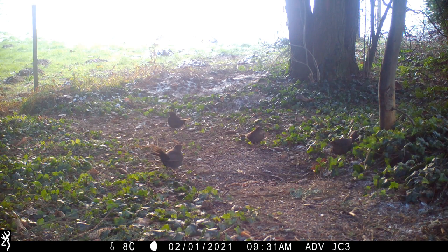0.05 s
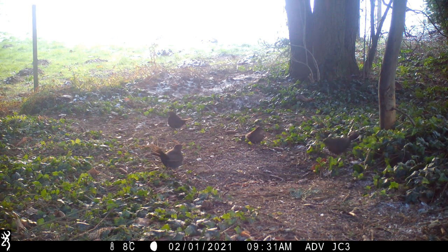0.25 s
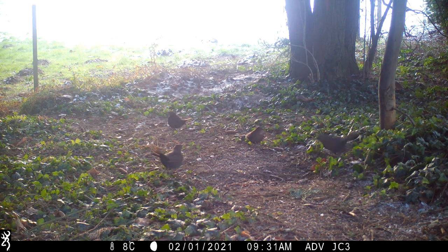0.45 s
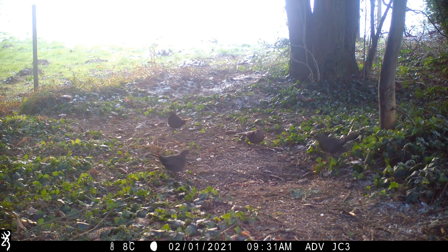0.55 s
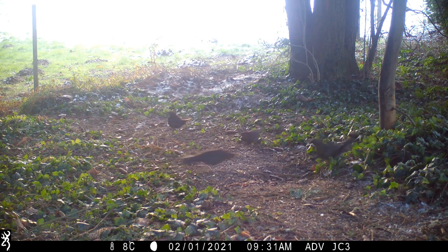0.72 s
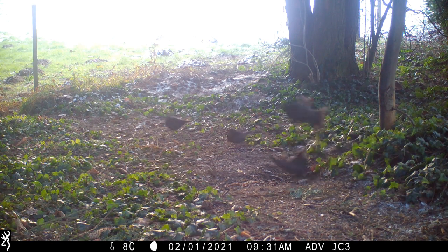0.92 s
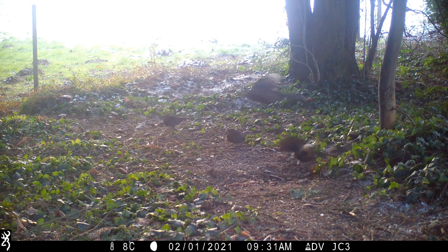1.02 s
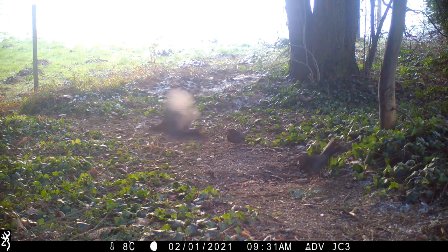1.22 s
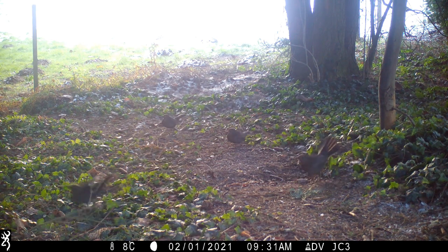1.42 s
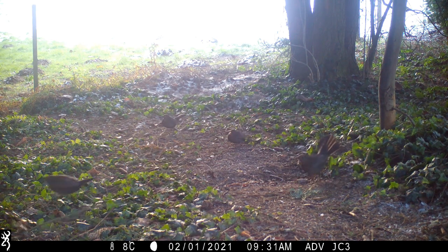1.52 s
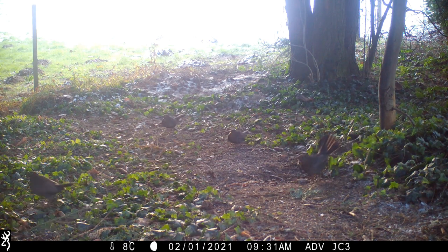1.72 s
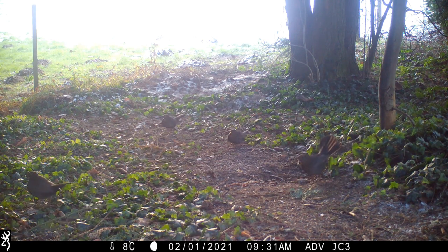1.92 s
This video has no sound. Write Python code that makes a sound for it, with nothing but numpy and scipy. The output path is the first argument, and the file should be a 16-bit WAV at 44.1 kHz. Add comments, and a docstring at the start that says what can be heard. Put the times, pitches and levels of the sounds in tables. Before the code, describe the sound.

A blackbird clucks twice after a snappy wing flap. Birds scuff through dry leaves, one flutters off, then two more clucks and a distant whistle follow. The quiet woodland has a steady faraway wash and a faint microphone whine.

```python
"""Blackbirds forage in a quiet woodland clearing, over a distant wash and a trail camera's faint whine.
First, wings flap and snap, and one bird gives two short clucks that arch in pitch and echo off trunks.
Then feet scuff and crack the dry leaves, and a bird takes wing with a soft rush of air.
Thin, high bird notes come from far away, and the near bird clucks twice more.
Last come a longer, lower far whistle, two snaps and one more flap."""
import sys
import numpy as np
from scipy import signal
from scipy.fft import rfft, irfft
from scipy.io import wavfile

SR = 44100
rng = np.random.default_rng(int(sys.argv[2]) if len(sys.argv) > 2 else 0)


def put_to_file(sound):
    """Save the sound as 16-bit audio at rate SR, in the file named by the first command-line argument."""
    columns = np.atleast_2d(sound).T  # one column per channel
    safe = np.clip(columns, -1, 1)
    whole_steps = np.round(safe * 32767)
    wavfile.write(sys.argv[1], SR, whole_steps.astype(np.int16))


N = 85995
TIME = np.arange(N) / SR


def amp(db):
    """Turns decibels (dB) into a number to multiply a sound by."""
    return 10 ** (np.asarray(db) / 20)


def unit(x):
    """Scales a signal to an average strength (rms) of 1."""
    return x / np.sqrt(np.mean(x ** 2) + 1e-20)


def add(mix, start, sound):
    """Mixes a sound in at a start time in seconds."""
    part = mix[max(round(start * SR), 0):][:len(sound)]
    part += sound[:len(part)]


def colour(x, points, tilt_db=0):
    """Sets the balance of low and high in x from (Hz, dB) points and a tilt per octave; strength 1."""
    octaves = np.log2(np.fft.rfftfreq(len(x), 1 / SR) + 1)
    hz, db = np.transpose(points)
    gain = amp(np.interp(octaves, np.log2(hz), db) + tilt_db * octaves)
    return unit(irfft(rfft(x) * gain, len(x)))


def drift(hz):
    """A smooth random wobble, up to about hz times a second; strength 1."""
    freqs = np.fft.rfftfreq(N, 1 / SR)
    keep_slow = np.exp(-(freqs / hz) ** 2) * (freqs > 0)
    return unit(irfft(rfft(rng.standard_normal(N)) * keep_slow, N))


def swell(peak, rise, fall):
    """A loudness curve that rises softly to a peak and dies away; times in seconds."""
    t = TIME - peak
    return np.exp(-(np.minimum(t, 0) / rise) ** 2 - np.maximum(t, 0) / fall)


def crackle(hiss, per_second=2200, spread_db=5):
    """Many tiny cracks of uneven size, with a share of smooth hiss mixed in."""
    size = amp(spread_db * np.minimum(rng.exponential(1, N), 3.5)) * rng.choice([-1, 1], N)
    cracks = size * (rng.random(N) < per_second / SR)
    return unit(cracks) + hiss * rng.standard_normal(N)


# The tone of the wash, then of its highest part. Each row: frequency in Hz, relative level in dB.
WASH_COLOUR = [(15, -57.5), (25, -24), (143, -17.5), (511, -8.5), (966, -5), (1250, -3), (1380, -2.5),
               (1620, -4.5), (1780, -5.5), (2010, -10), (3620, -23.5), (5660, -36.5), (7000, -45),
               (9100, -63), (15400, -120)]
WASH_TOP_COLOUR = [(8500, -50), (10800, -55), (12000, -70), (15500, -73)]
# The low hum. Each row: pitch in Hz, level in dB.
HUM_TONES = [(49, -69), (268, -67.5)]


def background():
    """The distant wash of the countryside, a nearly steady noise, with a trace of low hum."""
    level_db = -40.5 + .4 * drift(2.3)
    wash = amp(level_db) * colour(rng.standard_normal(N), list(WASH_COLOUR) + list(WASH_TOP_COLOUR))
    hum = sum(amp(db) * np.sqrt(2) * np.sin(2 * np.pi * (hz * TIME + rng.random()))
              for hz, db in HUM_TONES)
    return wash + hum


# Notes of far birds. Each row: start in seconds, length in seconds, pitch in Hz, level in dB.
FAR_WHISTLES = [(.305, 0.032, 8100, -63), (1.125, .035, 8150, -63), (1.275, .035, 6770, -61),
                (1.78, .30, 1358, -38.5)]


def far_whistle(length, hz, db, waver_hz=25):
    """A far bird whistles one faint, wavering note."""
    t = np.arange(0, length, 1 / SR)
    pitch = hz + waver_hz * drift(200)[:len(t)]
    fade = np.sqrt(np.sin(np.pi * t / length))
    return amp(db) * fade * np.sin(2 * np.pi * np.cumsum(pitch) / SR)


# Echoes from the ground and trunks. Each row: delay in seconds, level in dB.
TRUNK_ECHOES = [(.0085, -36), (0.0126, -25), (0.0147, -19.5), (0.0246, -43)]


def woodland(x):
    """Adds a few distinct echoes, quick scatter from the undergrowth and a faint, dull tail."""
    t = np.arange(SR // 2) / SR
    echoes = np.zeros(len(t))
    for db, fade_s in [(-25, .086), (-36.5, .95)]:  # the scatter, then the tail
        dull_noise = colour(rng.standard_normal(len(t)), [(200, 9.5), (2000, 8), (8000, -4.5)])
        tail = dull_noise * amp(-60 * t / fade_s) * (t > .01)
        echoes += amp(db) * tail / np.linalg.norm(tail)
    soft_pulse = np.hanning(11)
    for delay, db in TRUNK_ECHOES:
        add(echoes, delay, amp(db) * soft_pulse / soft_pulse.sum())
    return x + signal.fftconvolve(x, echoes)[:N]


# The tone of dry leaves. Each row: frequency in Hz, relative level in dB.
LEAF_COLOUR = [(20, -80.5), (150, -34.5), (600, -18), (1200, 0.5), (2400, 1.5), (3500, -1.5), (5000, -11.5),
               (7000, -16), (9000, -28), (11000, -33), (12500, -57.5)]
# The rustle between scuffs. Each row: time in seconds, level in dB.
RUSTLE_LEVELS = [(0, -51), (.2, -45), (0.301, -50), (.48, -52), (.56, -46), (.70, -46), (.95, -44),
                 (1.12, -49), (1.25, -54), (1.35, -50), (1.43, -48), (1.75, -46.5), (1.95, -51)]
# Scuffs of feet. Each row: peak time, rise and fall in seconds, level in dB,
# treble tilt in dB per octave (higher is brighter).
FOOT_SCUFFS = [(.125, 0.026, 0.039, -39.5, -0.5), (.513, 0.0048, 0.022, -29.5, -3.5),
               (.536, 0.0033, 0.022, -32.5, -1.5), (0.586, .006, 0.017, -36, -5.5),
               (.617, 0.0084, 0.0096, -36, 0), (.660, 0.021, 0.013, -39.5, -4.5),
               (.730, 0.0027, 0.0061, -42, -1), (0.739, 0.0037, 0.014, -31, -0.5),
               (0.753, 0.003, 0.0042, -27.5, -5), (0.794, 0.015, 0.016, -34, -0.5),
               (0.817, 0.0043, 0.0033, -24.5, -1), (0.862, 0.024, .010, -29, -1),
               (.897, 0.0054, 0.046, -40, 0), (.951, 0.023, 0.025, -35, -2.5),
               (1.044, 0.002, 0.0084, -29.5, -2), (1.385, 0.01, 0.021, -33.5, 0),
               (1.510, .005, 0.015, -36.5, 3.5), (1.573, .008, .008, -45, 1.5),
               (1.597, 0.0094, 0.036, -35.5, -0.5), (1.823, 0.015, 0.018, -40, 3)]


def leaves():
    """Dry leaves rustle unevenly, and each scuff of a foot sets off a clump of crackles."""
    rustle_db = np.interp(TIME, *np.transpose(RUSTLE_LEVELS)) + 3.6 * drift(22)
    rustle = amp(rustle_db) * colour(crackle(hiss=.81), LEAF_COLOUR)
    scuffs = sum(amp(db) * swell(peak, rise, fall) * colour(crackle(hiss=.31), LEAF_COLOUR, tilt_db)
                 for peak, rise, fall, db, tilt_db in FOOT_SCUFFS)
    return rustle + scuffs


# Wing strokes, then the rush of air as a bird takes wing.
# Each row: peak time, rise and fall in seconds, level in dB.
WING_STROKES = [(.061, 0.0091, 0.012, -23), (0.074, 0.0058, 0.0062, -36.5), (0.151, 0.02, 0.065, -38),
                (0.895, 0.0087, 0.018, -31), (1.824, 0.021, 0.0092, -32)]
AIR_RUSHES = [(.86, 0.11, 0.11, -60)]
# The tone of the feathers, then of the air. Each row: frequency in Hz, relative level in dB.
FEATHER_COLOUR = [(100, -33.5), (300, -24.5), (520, -5), (900, -1.5), (1250, -3), (1750, 3.5), (2500, -3.5),
                  (4000, -11), (6000, -26), (10000, -46), (13000, -70)]
AIR_COLOUR = [(40, -13), (130, -10.5), (250, -2), (600, 1.5), (1200, -16), (4000, -60.5)]


def wings():
    """Feathers beat and brush the ground, and push a soft, low rush of air."""
    strokes = sum(amp(db) * swell(peak, rise, fall) for peak, rise, fall, db in WING_STROKES)
    rushes = sum(amp(db) * swell(peak, rise, fall) for peak, rise, fall, db in AIR_RUSHES)
    feathers = strokes * colour(crackle(hiss=.89), FEATHER_COLOUR)
    air = rushes * colour(rng.standard_normal(N), AIR_COLOUR)
    return feathers + air


# Snaps of twigs and wing tips. Each row: start in seconds, level in dB, ring pitch in Hz,
# decay in seconds, level of the bright edge in dB compared with the ring.
SHARP_SNAPS = [(.0590, -15, 1730, 0.00047, -22), (.0710, -10.5, 1830, 0.00051, -21),
               (.5360, -29, 2300, 0.00035, 2), (.6220, -25, 2550, .0003, -10),
               (.7295, -23, 2030, 0.00059, -10), (.8167, -28, 2850, .0004, 6.5),
               (.8198, -18, 2500, 0.0002, -16), (.9260, -5.5, 2290, 0.00023, -13),
               (1.0430, -25.5, 2030, 0.00035, 0.5), (1.0796, -10, 2020, 0.00029, -8.5),
               (1.5048, -23, 3350, 0.00019, -4.5), (1.5093, -26.5, 3050, 0.00027, -7),
               (1.7740, -11, 1550, 0.00018, -18.5), (1.7758, -19, 1270, 0.00048, -14)]


def snap(db, hz, decay, edge_db, edge_hz=4700, edge_s=.00016):
    """A twig or wing tip snaps and rings for two or three cycles, with a bright edge."""
    t = np.arange(0, .01, 1 / SR)
    ring = t / decay * np.exp(1 - t / decay) * np.sin(2 * np.pi * hz * t)
    edge = t / edge_s * np.exp(1 - t / edge_s) * np.sin(2 * np.pi * edge_hz * t)
    band = signal.butter(2, [400, 8500], "band", fs=SR, output="sos")
    return amp(db) * signal.sosfilt(band, ring + amp(edge_db) * edge)


# The blackbird's clucks. Each row: start and length in seconds, level in dB, top pitch in Hz,
# where the top falls (0 is the start, 1 the end), growth in loudness in dB, rasp level in dB,
# rasp pitch as a multiple of the tone's, level of the overtone an octave up in dB.
# The rasp and overtone levels are compared with the main tone.
BLACKBIRD_CLUCKS = [(.2175, .0503, -1.72, 1748, .64, 14.5, -22.5, 1.22, -52),
                    (.4035, 0.043, -13, 1697, 0.44, 6, -45, 1.2, -34.5),
                    (1.4915, .038, -10.5, 1489, .50, 11, -11, 1.1, -52),
                    (1.6175, .0445, -7.5, 1622, 0.6, 15.5, -15, 1.38, -52)]


def cluck(length, db, top_hz, top_at, growth_db, rasp_db, rasp_ratio, octave_db):
    """A blackbird's nearly pure tone arches up and down, buzzy as it starts and raspy at its loudest."""
    start_hz, end_hz, flutter_hz, rasp_width_hz = 1032.4, 893, 330, 460
    attack_s, release_s, buzz_s = .0084, .0097, .0041
    t = np.arange(0, length, 1 / SR)
    progress = t / length
    loudest_at = top_at + .058  # just after the highest pitch

    before_top = np.maximum(1 - progress / top_at, 0)
    after_top = np.maximum((progress - top_at) / (1 - top_at), 0)
    pitch = top_hz - (top_hz - start_hz) * before_top ** 1.856 - (top_hz - end_hz) * after_top ** 2.34
    phase = 2 * np.pi * np.cumsum(pitch) / SR
    opening_buzz = amp(-9.5) * np.exp(-(t / buzz_s) ** 2 / 2)
    overtones = (amp(octave_db) + opening_buzz) * np.sin(2 * phase) + amp(-50.5) * np.sin(3 * phase)
    flutter = 1 + .19 * after_top * np.sin(2 * np.pi * flutter_hz * t)  # the tone shakes as it falls
    tone = (np.sin(phase) + overtones) * flutter

    # The rasp is a narrow band of noise that glides along above the tone.
    wobble = (drift(rasp_width_hz) + 1j * drift(rasp_width_hz))[:len(t)]
    fuzz = unit((wobble * np.exp(1j * phase * rasp_ratio)).real)
    rasp = amp(rasp_db) * fuzz * swell(loudest_at * length, rise=.0054, fall=.032)[:len(t)]

    rise_db = -growth_db * np.maximum(1 - progress / loudest_at, 0) ** 1.54
    fade_db = -6.5 * (np.maximum(progress - loudest_at, 0) / (1 - loudest_at)) ** 2
    soft_start = np.minimum(t / attack_s, 1)
    soft_end = np.sin(np.pi / 2 * np.minimum((length - t) / release_s, 1))
    return soft_start * soft_end * amp(db + rise_db + fade_db) * (tone + rasp)


def scene():
    """Birds, leaves and twigs echo in the clearing, over the distant wash; one channel."""
    sounds = wings() + leaves()
    for table, source in [(BLACKBIRD_CLUCKS, cluck), (SHARP_SNAPS, snap), (FAR_WHISTLES, far_whistle)]:
        for start, *settings in table:
            add(sounds, start, source(*settings))
    return (woodland(sounds) + background())[None]


def record(dry):
    """The camera dulls the treble, rounds off the loudest peak, adds a whine and cuts the very top."""
    whine_hz, whine_db, flips_per_s = 7796.3, -57.5, 59.6
    ceiling, hardness, cutoff_hz = .97, 24, 15700
    hz = np.fft.rfftfreq(N, 1 / SR)
    dull = irfft(rfft(dry) * amp(np.interp(hz, [10500, 12500], [0, -8])), N)
    rounded = dull / (2 + abs(dull / ceiling) ** hardness) ** (1 / hardness)
    flips = np.tanh(20 * np.sin(np.pi * flips_per_s * TIME))  # turns the wave upside down and back
    whine = amp(whine_db) * np.sin(2 * np.pi * whine_hz * TIME) * flips
    treble_cut = signal.firwin(511, cutoff_hz, window=("kaiser", 9), fs=SR)
    return signal.oaconvolve(rounded + whine, treble_cut[None], "same")


dry = scene()
out = record(dry)
put_to_file(out)
```